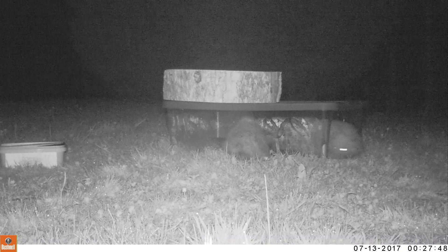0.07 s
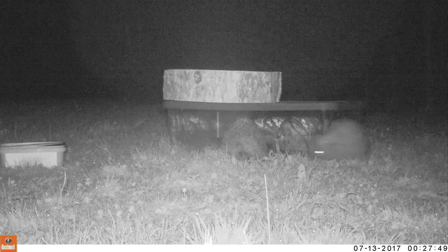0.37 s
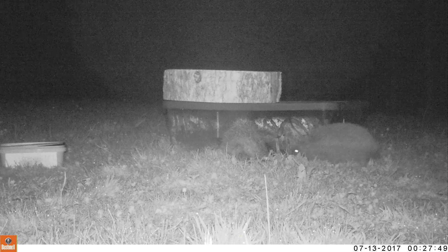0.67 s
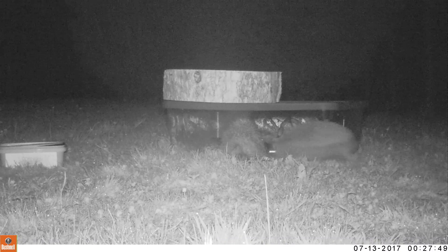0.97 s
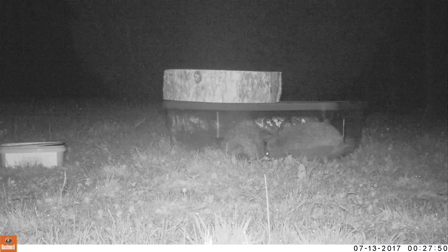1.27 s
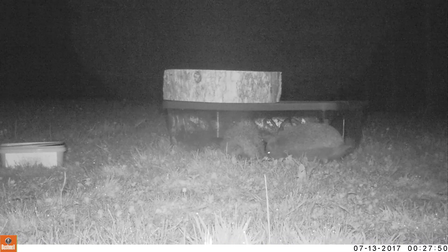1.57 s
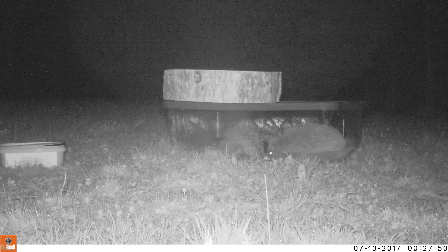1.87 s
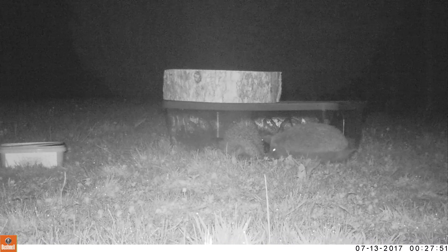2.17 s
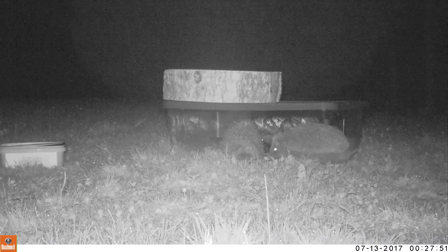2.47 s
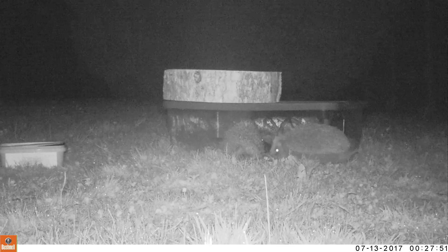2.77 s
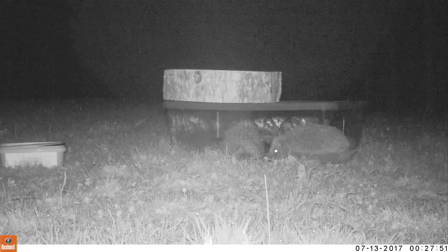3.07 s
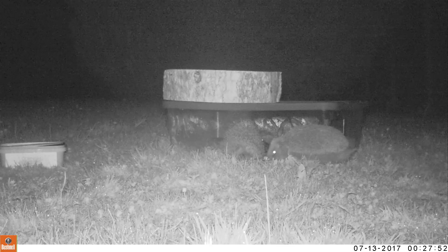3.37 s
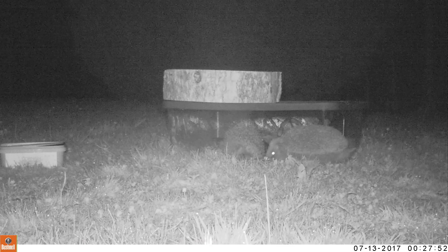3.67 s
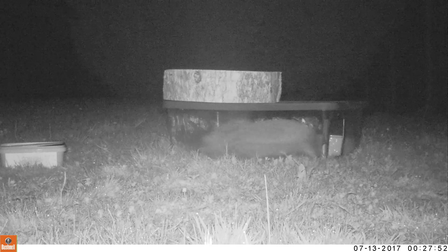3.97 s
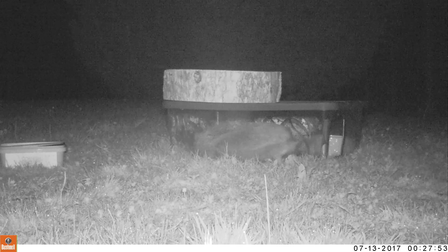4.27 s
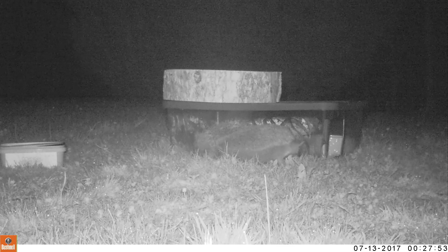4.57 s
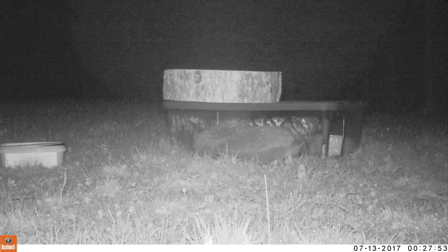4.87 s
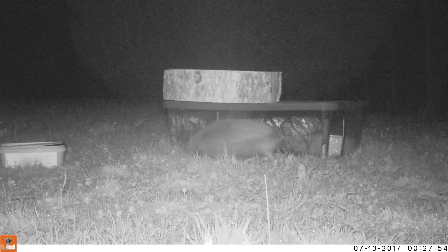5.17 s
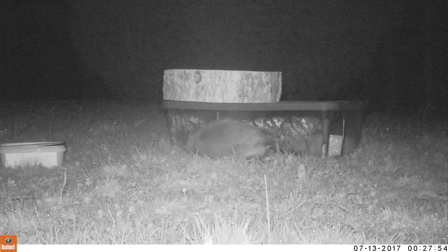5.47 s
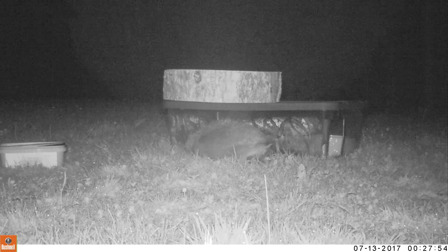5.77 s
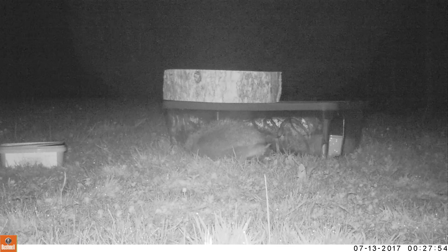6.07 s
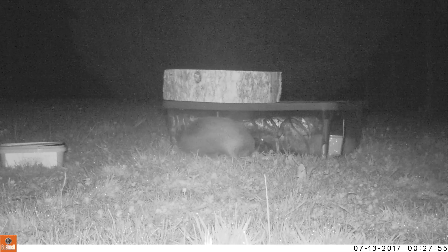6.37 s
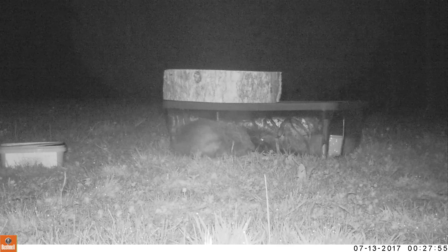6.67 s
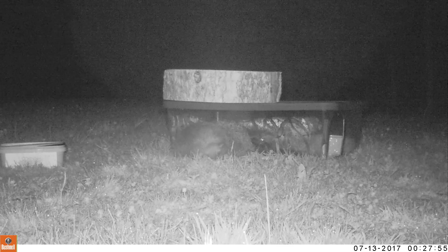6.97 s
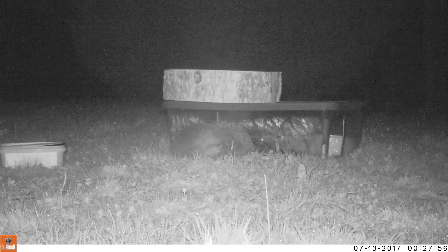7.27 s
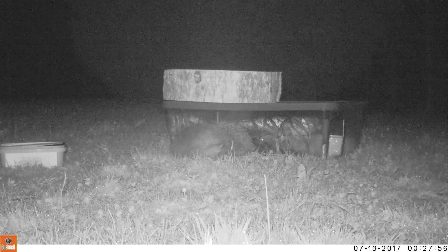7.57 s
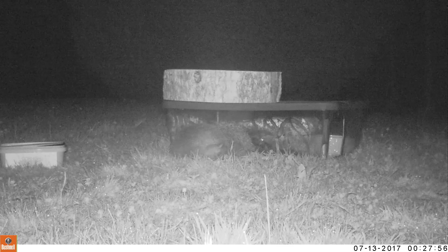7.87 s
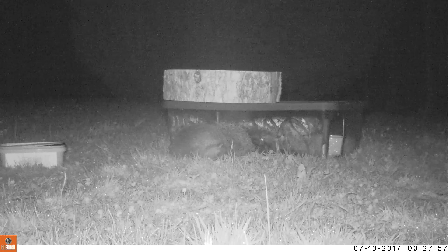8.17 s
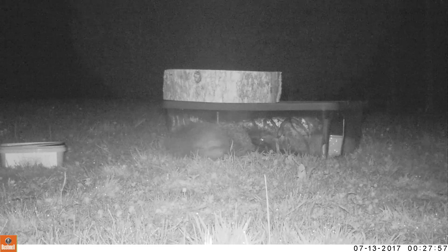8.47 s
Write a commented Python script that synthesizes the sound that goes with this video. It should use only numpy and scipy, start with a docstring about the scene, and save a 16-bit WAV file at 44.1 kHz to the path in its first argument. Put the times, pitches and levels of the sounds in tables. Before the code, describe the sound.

A hedgehog rustles and crackles faintly in dry grass by a plastic box, over soft night rumble, hiss and a distant engine drone.

```python
"""Night on a lawn: soft rumble, hiss and the slowly sinking drone of a far engine run throughout.
In the first second a hedgehog shuffles at a plastic feeding box: dry grass and spines crackle and snap,
and at half a second the spines squeak once on the wall. After a lull it stirs again, briefly, near
4, 5.3 and 6.5 s. A few metres off, a trail camera's narrow microphone port rings near 4 and 12 kHz
and colours the crackle and the hiss."""
import sys
import numpy as np
from scipy import signal
from scipy.fft import rfft, irfft
from scipy.io import wavfile
from scipy.ndimage import uniform_filter1d

SR = 44100
rng = np.random.default_rng(int(sys.argv[2]) if len(sys.argv) > 2 else 0)


def transcribe(u):
    """Save the signal u as a 16-bit wav file named by the first command-line argument.

    u: samples, shape (n,) or (channels, n), limited to [-1, 1]; the rate is SR.
    q: integer samples, one column per channel.
    """
    v = np.clip(np.atleast_2d(u).T, -1, 1)
    q = np.round(v * 32767).astype(np.int16)
    wavfile.write(sys.argv[1], SR, q)


N = 384552
TIME = np.arange(N) / SR

# The animal shifts its body, a swell of rustle each time.
# Each row: peak time in seconds, half-length in seconds, coarse level in dB, fine level in dB.
BODY_SHUFFLES = [(.28, 0.11, -75, -82.5), (.5, .062, -67.5, -82), (.96, 0.076, -77.5, -90.5),
                 (4.1, 0.093, -86, -87.5), (5.28, .07, -88, -92.5), (6.46, 0.08, -79, -87.5)]
# Quick brushes of the spiny coat against grass and box.
# Each row: start in seconds, length in seconds, coarse level in dB, fine level in dB.
COAT_STROKES = [(0.184, 0.085, -74, -90.5), (3.937, 0.049, -81, -80), (4.028, 0.049, -77, -94),
                (4.17, 0.045, -80, -90), (5.17, .032, -77, -83.5), (5.33, .02, -86, -83.5),
                (6.45, 0.027, -74.5, -92.5), (6.61, .015, -83, -94.5)]
def rustle(edge_s=.005):
    """Grass crushed underfoot and spines brushing past: dense clicks that ring the port."""
    coarse_gain, fine_gain = undb(-102), undb(-104.5)  # between moves the grass barely stirs
    for peak_s, half_length, coarse_db, fine_db in BODY_SHUFFLES:
        effort = swell(peak_s, half_length)
        coarse_gain = np.hypot(coarse_gain, effort * undb(coarse_db))
        fine_gain = np.hypot(fine_gain, effort * undb(fine_db))
    for start, length, coarse_db, fine_db in COAT_STROKES:
        inside_s = np.minimum(TIME - start, start + length - TIME)
        contact = np.clip(inside_s / edge_s + .5, 0, 1)
        coarse_gain = np.hypot(coarse_gain, contact * undb(coarse_db))
        fine_gain = np.hypot(fine_gain, contact * undb(fine_db))
    coarse = unit(box_echo(port_body(crackle(per_second=2200, spread_db=4))))
    fine = unit(box_echo(port_sizzle(crackle(per_second=1400, spread_db=2))))
    return coarse * coarse_gain + fine * fine_gain


def swell(peak_s, half_length, settle_ratio=1.1):
    """A rounded fade in and out, 1 at its peak, settling a little slower than it builds."""
    away = (TIME - peak_s) / (half_length * np.where(TIME < peak_s, 1, settle_ratio))
    return 1 / np.cosh(np.clip(away, -20, 20))


def crackle(per_second, spread_db):
    """Tiny fractures at random moments, many weak and a few strong."""
    size = undb(spread_db * np.minimum(rng.exponential(size=N), np.pi))
    return (rng.random(N) < per_second / SR) * size * rng.choice([-1, 1], N)


# The knock of the plastic wall. Each row: mode frequency in Hz, width in Hz, relative gain in dB.
WALL_MODES = [(1900, 220, 4), (3180, 160, -11), (3280, 110, 9), (4300, 170, -3)]
# Single stalks and spines snapping. Each row: start in seconds, level in dB over 5 ms before the echo.
STALK_SNAPS = [(.1682, -66), (0.196, -65.5), (.2525, -68), (0.2704, -65), (.279, -67), (.3114, -67),
               (.3374, -70), (.377, -67.5), (.583, -59), (.5915, -64), (0.849, -69), (0.89, -72),
               (0.956, -68), (.9845, -70)]
def snaps(burst_s=.00096, hard_snap_db=-60):
    """A stalk gives way in a brief run of splinters; the harder the snap, the more it knocks the box."""
    out = np.zeros(N)
    t = TIME[:1024]
    level_window = int(.005 * SR)
    lowpass = signal.butter(3, 5000, fs=SR)
    for start_s, db in STALK_SNAPS:
        splinters = rng.standard_normal(len(t)) * t * np.exp(-t / burst_s)
        knock_db = -2 + 1.3 * (db - hard_snap_db)
        body = port_body(splinters) + undb(knock_db) * ring(splinters, WALL_MODES)
        click = signal.lfilter(*lowpass, body) + undb(-24) * port_sizzle(splinters)
        click_rms = np.sqrt(np.sum(click ** 2) / level_window)
        start = int(start_s * SR)
        out[start:start + len(t)] += undb(db) * click / click_rms
    return box_echo(out)


def squeak(peak_s=.495, peak_db=-62, pitch_hz=3930, rise_db_per_s=480, fall_db_per_s=800):
    """Spines stick and slip on the plastic: a thin, unsteady tone that grows, then lets go."""
    since_peak = TIME - peak_s
    db = peak_db + np.minimum(rise_db_per_s * since_peak, -fall_db_per_s * since_peak)
    hz = pitch_hz * (1 + .0047 * wander(250))
    phase = 2 * np.pi * np.cumsum(hz) / SR
    grip_db = 1.5 * wander(300)
    return undb(db + grip_db) * unit(np.sin(phase))


def box_echo(x, delay_s=.0079, echo_db=-10):
    """The box wall throws back one tight reflection."""
    lag = int(delay_s * SR)
    return x + undb(echo_db) * np.pad(x, (lag, 0))[:N]


# The port's bite near 4 kHz. Each row: centre in Hz, width in Hz, relative gain in dB.
PORT_LOW_MODES = [(3940, 270, 15), (3430, 520, -19), (4100, 400, -21), (5000, 1800, -32)]
def port_body(x):
    """The microphone port's lower resonances give each click a pitched ring."""
    return ring(x, PORT_LOW_MODES)


# The port's sheen near 12 kHz. Each row: centre in Hz, width in Hz, gain per pass in dB.
PORT_HIGH_MODES = [(11660, 1600, 1), (10600, 1500, -10.5)]
def port_sizzle(x):
    """The port's upper resonance, run twice for steep sides."""
    return ring(ring(x, PORT_HIGH_MODES), PORT_HIGH_MODES)


# The fader ride of the drone. Each row: time in seconds, level in dB.
ENGINE_LEVELS = [(0.3, -58), (.8, -69), (1.2, -66.5), (1.55, -56.5), (2.1, -55.5), (2.45, -58),
                 (2.95, -52.5), (4, -53.5), (4.8, -50.5), (6.1, -54.5), (6.6, -59), (7.4, -59),
                 (8.25, -53.7), (8.7, -56.5)]
def far_engine(start_hz=101.6, sag_hz_per_s=.78, octave_db=-27):
    """A slowing engine: only its firing tone and a faint octave carry, fading and returning on the air."""
    firing_hz = start_hz - sag_hz_per_s * TIME
    phase = 2 * np.pi * np.cumsum(firing_hz) / SR
    tone = unit(np.sin(phase) + undb(octave_db) * np.sin(2 * phase))
    db = np.interp(TIME, *np.transpose(ENGINE_LEVELS))
    return undb(db + .64 * wander(5.4)) * tone


# The bass-heavy EQ of the background bed. Each row: frequency in Hz, relative level in dB.
AIR_SPECTRUM = [(12, 1), (18, 8), (24, 2.5), (52, -2.5), (75, -5.5), (120, -8.5), (200, -14), (320, -18.5),
                (500, -24), (1000, -32.5), (2000, -39.5), (3000, -42), (5000, -46), (8000, -48.5),
                (13500, -49.5)]
def night_air(air_db=-51.5, port_db=-88.5):
    """Steady distant rumble and microphone hiss; a little noise rings the port."""
    air = coloured_noise(AIR_SPECTRUM) * undb(air_db + .53 * wander(3.3))
    port = unit(ring(rng.standard_normal(N), [(3930, 500, -1), (12060, 1100, -13.5)]))
    return air + undb(port_db) * port


def coloured_noise(spectrum):
    """Noise of rms 1, shaped by an EQ curve of (Hz, dB) points."""
    hz, db = np.transpose(spectrum)
    bin_hz = np.maximum(np.fft.rfftfreq(N, 1 / SR), 1)
    eq = undb(np.interp(np.log(bin_hz), np.log(hz), db))
    return unit(irfft(rfft(rng.standard_normal(N)) * eq, N))


def ring(x, modes):
    """Parallel band-pass resonators, each given as (centre Hz, width Hz, gain dB)."""
    return sum(undb(db) * signal.lfilter(*signal.iirpeak(hz, hz / width, fs=SR), x)
               for hz, width, db in modes)


def wander(rate_hz):
    """Random modulation of rms 1: sample-and-hold, smoothed twice."""
    hold = max(int(SR / rate_hz), 1)
    steps = np.repeat(rng.standard_normal(N // hold + 1), hold)
    return unit(uniform_filter1d(uniform_filter1d(steps, hold), hold)[:N])


def undb(db):
    """Decibels to gain."""
    return 10 ** (np.asarray(db) / 20)


def unit(x):
    """Scale to rms 1."""
    return x / np.sqrt(np.mean(x ** 2))


def scene():
    """The hedgehog over the night bed, in mono."""
    return (rustle() + snaps() + squeak() + far_engine() + night_air())[None]


def record(dry):
    """The camera cuts the top steeply above 13.7 kHz."""
    return signal.sosfilt(signal.ellip(10, .1, 70, 13700, fs=SR, output="sos"), dry)


dry = scene()
out = record(dry)
transcribe(out)
```